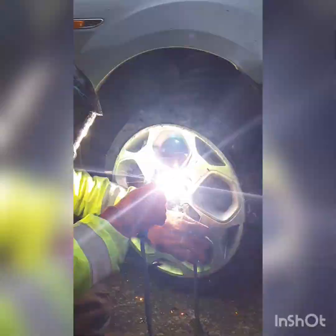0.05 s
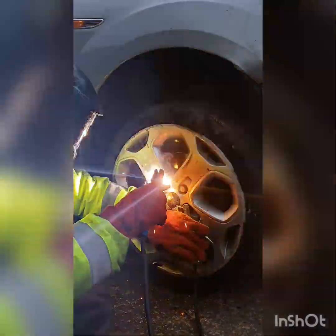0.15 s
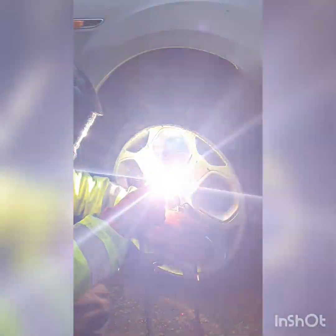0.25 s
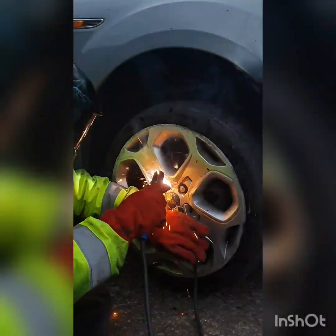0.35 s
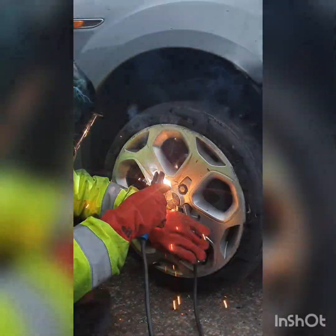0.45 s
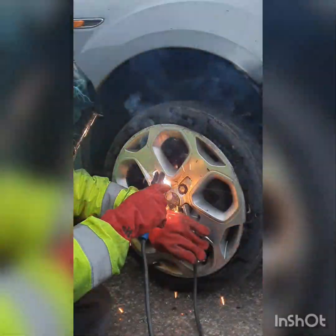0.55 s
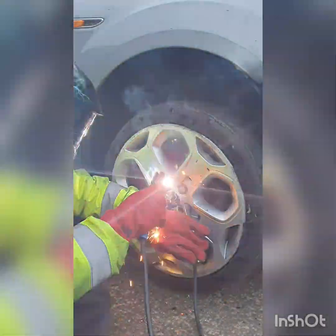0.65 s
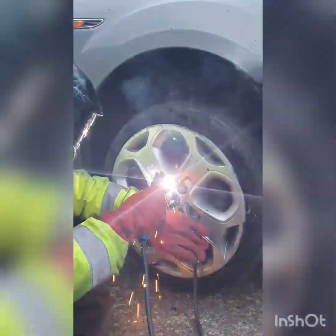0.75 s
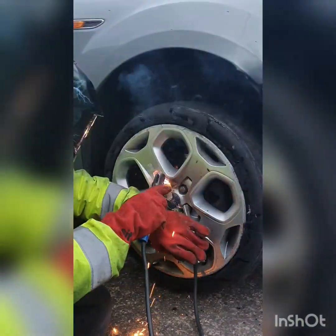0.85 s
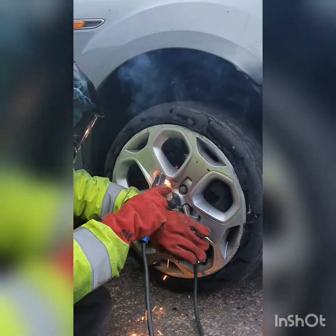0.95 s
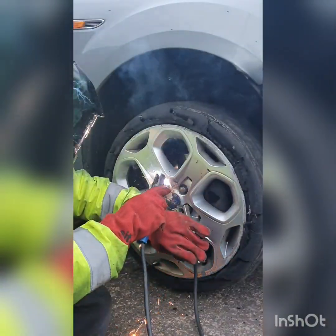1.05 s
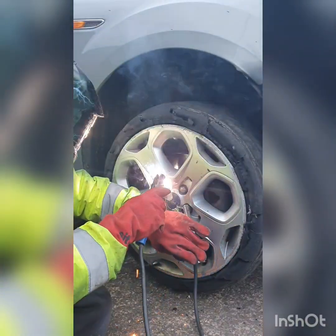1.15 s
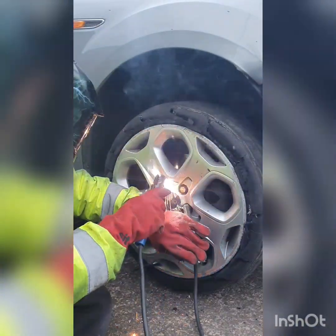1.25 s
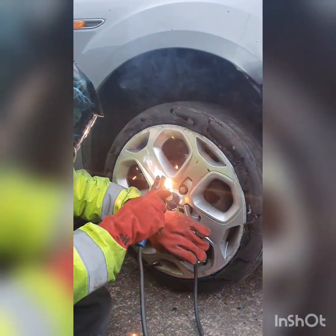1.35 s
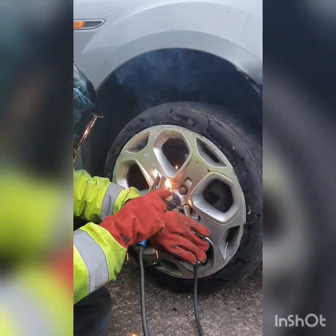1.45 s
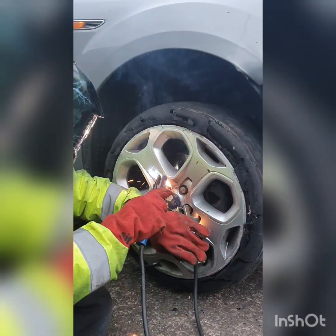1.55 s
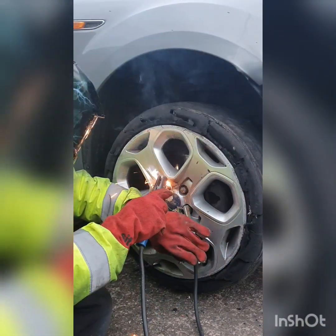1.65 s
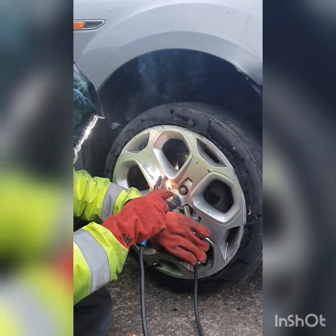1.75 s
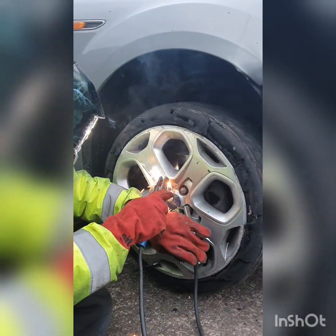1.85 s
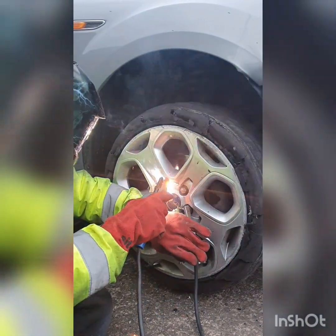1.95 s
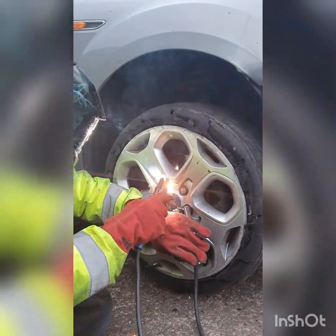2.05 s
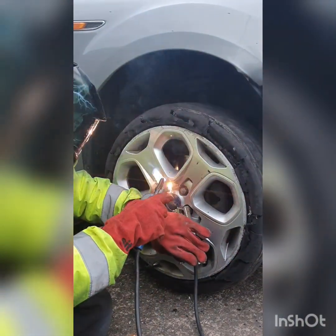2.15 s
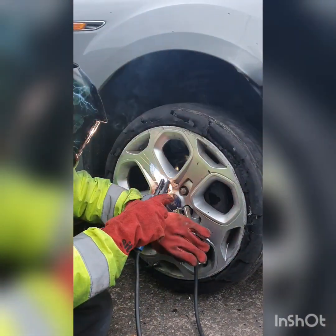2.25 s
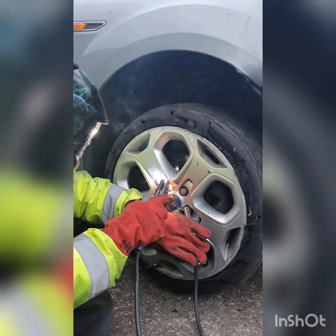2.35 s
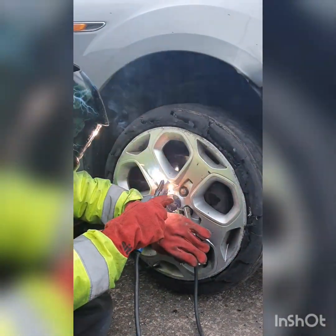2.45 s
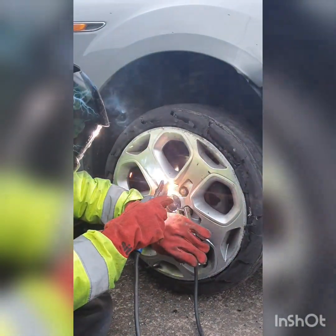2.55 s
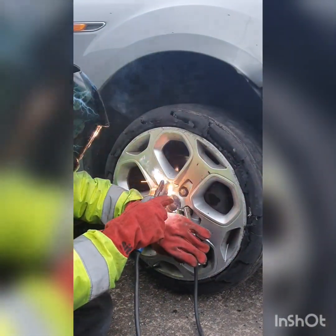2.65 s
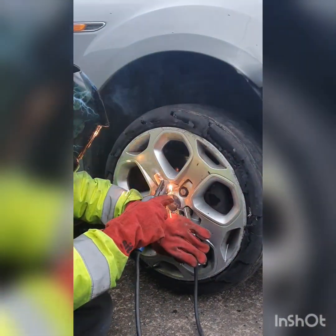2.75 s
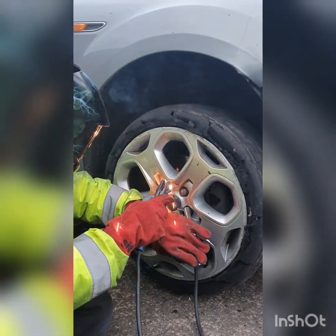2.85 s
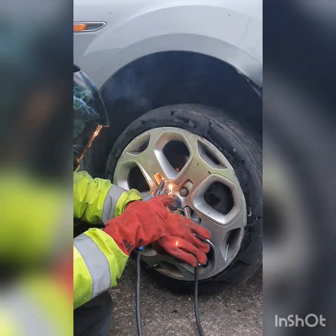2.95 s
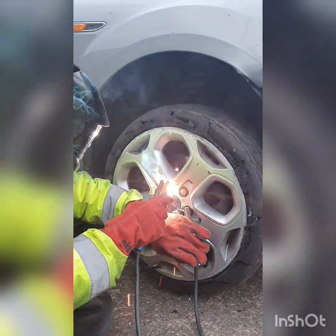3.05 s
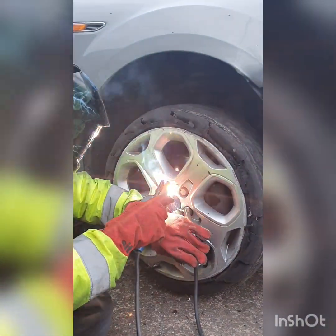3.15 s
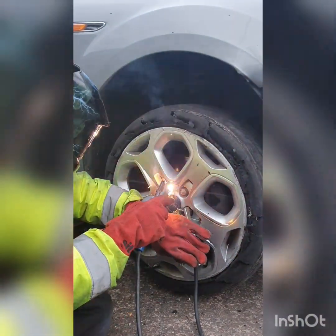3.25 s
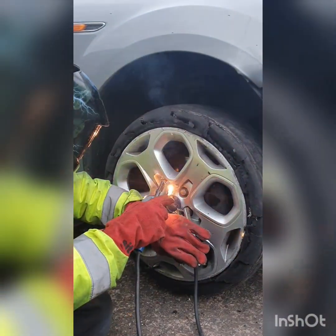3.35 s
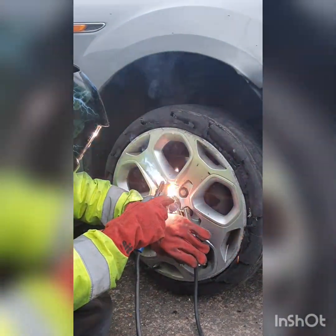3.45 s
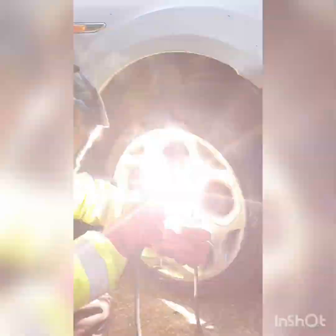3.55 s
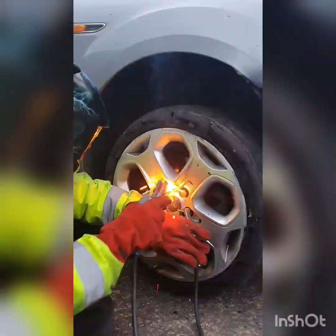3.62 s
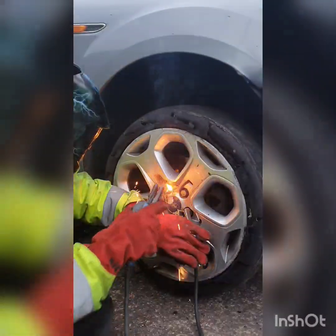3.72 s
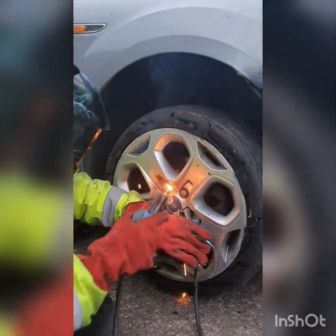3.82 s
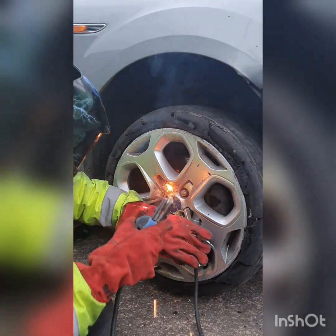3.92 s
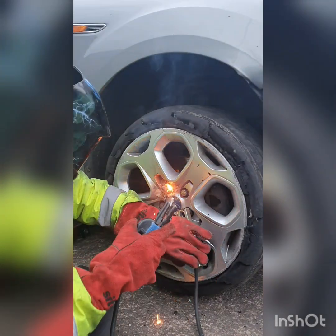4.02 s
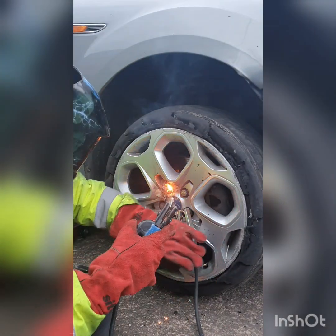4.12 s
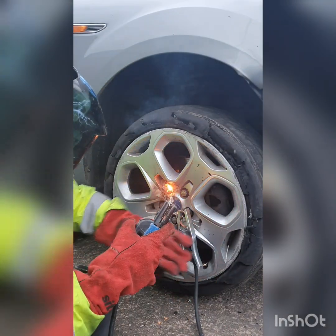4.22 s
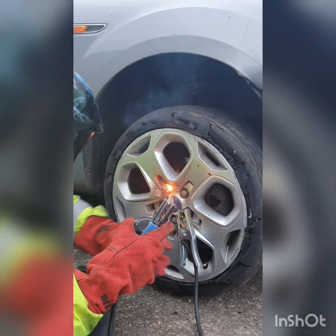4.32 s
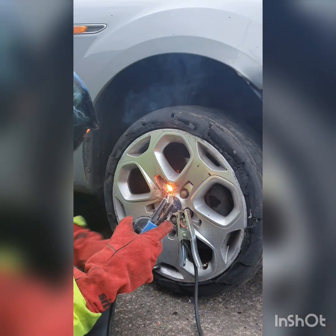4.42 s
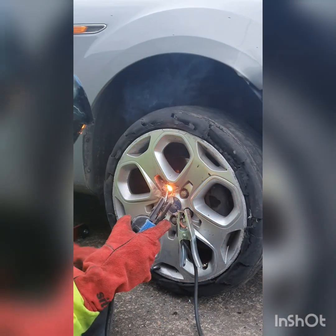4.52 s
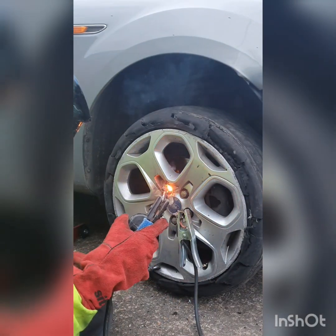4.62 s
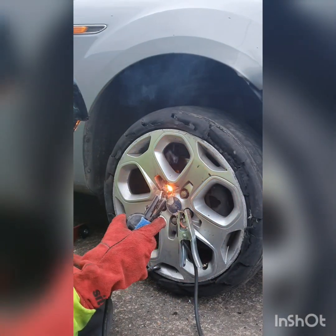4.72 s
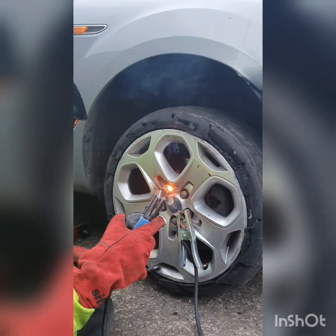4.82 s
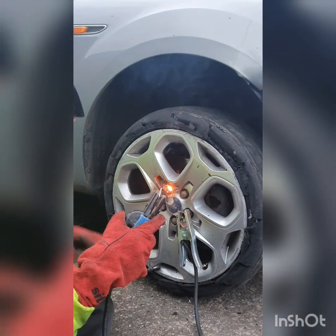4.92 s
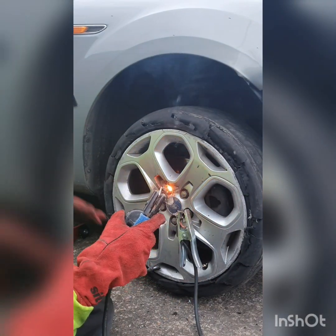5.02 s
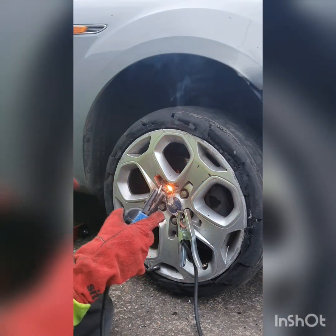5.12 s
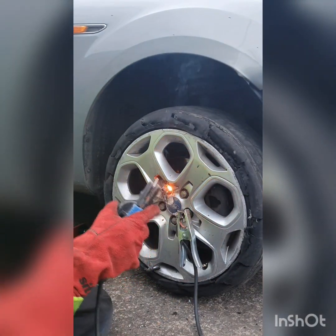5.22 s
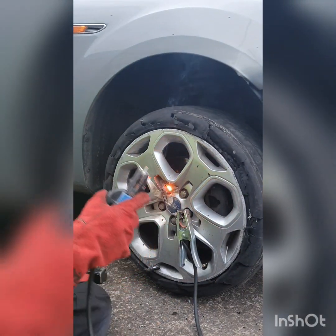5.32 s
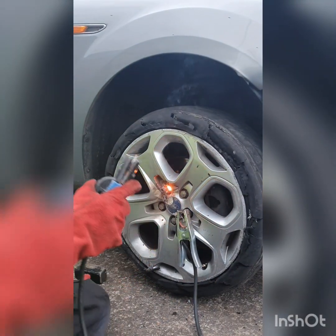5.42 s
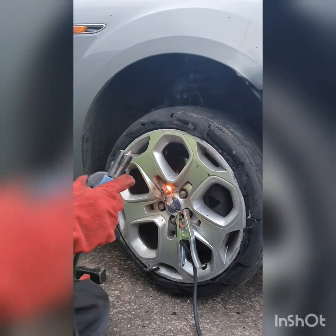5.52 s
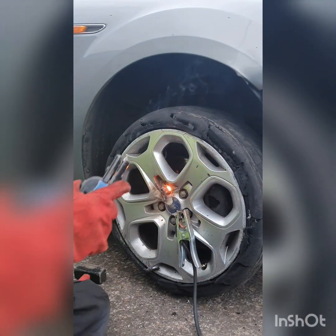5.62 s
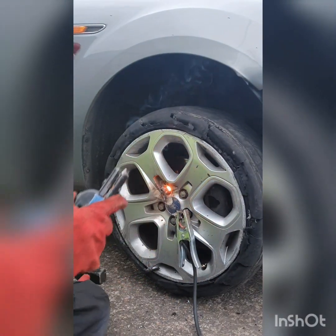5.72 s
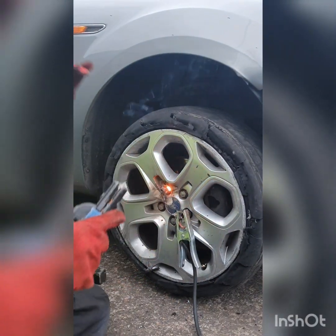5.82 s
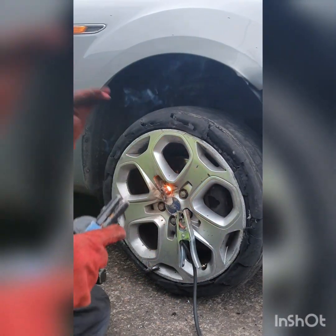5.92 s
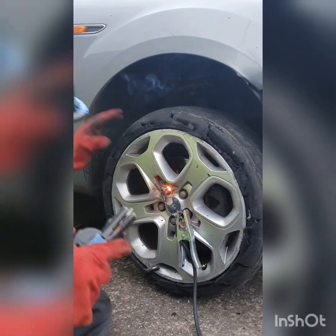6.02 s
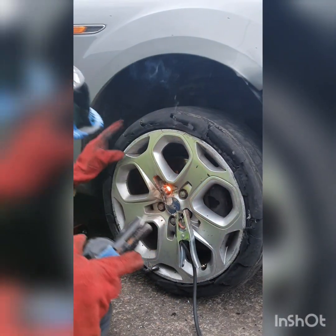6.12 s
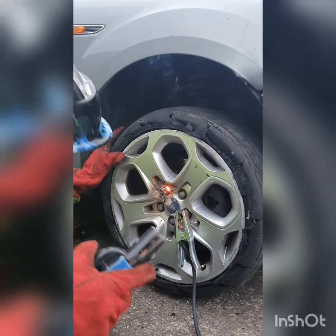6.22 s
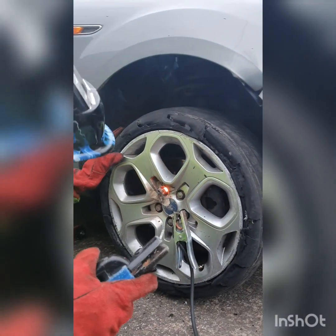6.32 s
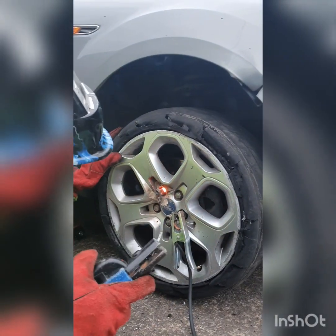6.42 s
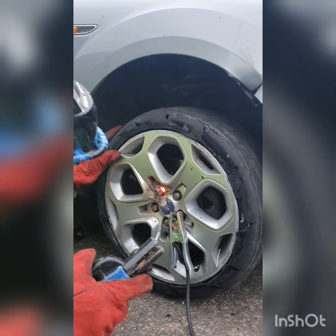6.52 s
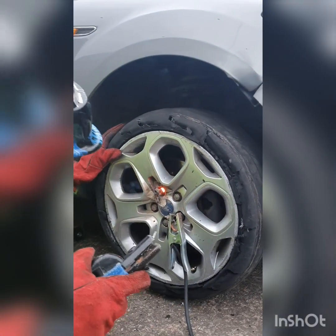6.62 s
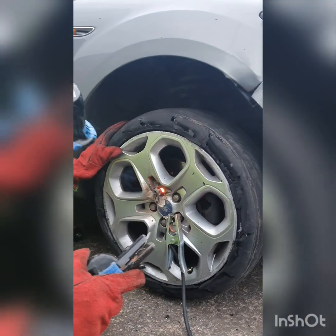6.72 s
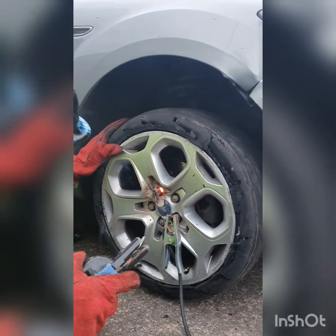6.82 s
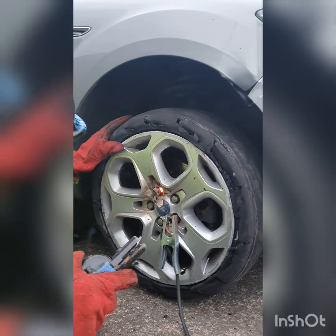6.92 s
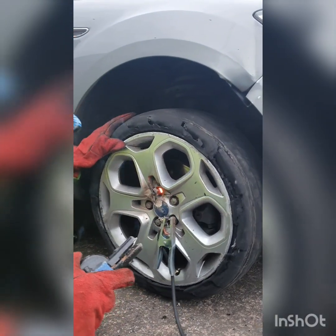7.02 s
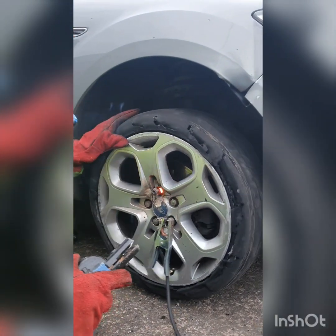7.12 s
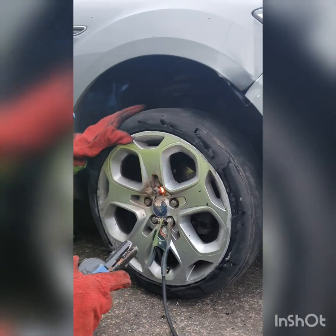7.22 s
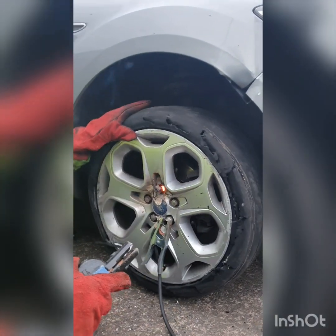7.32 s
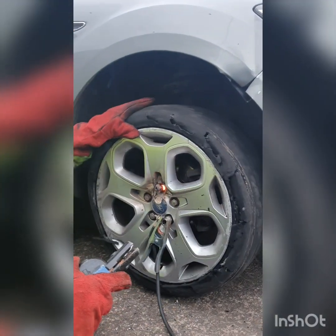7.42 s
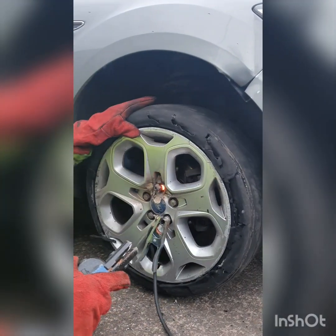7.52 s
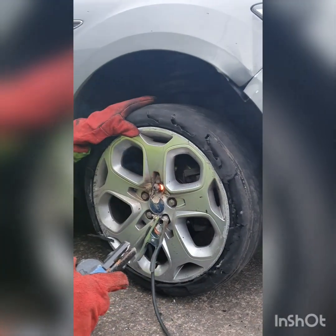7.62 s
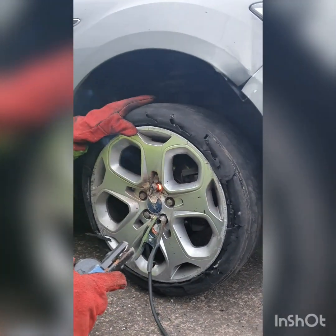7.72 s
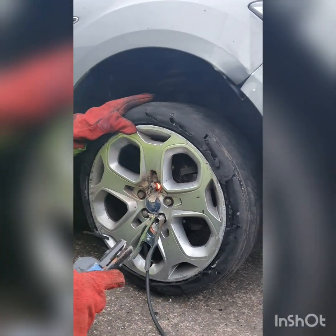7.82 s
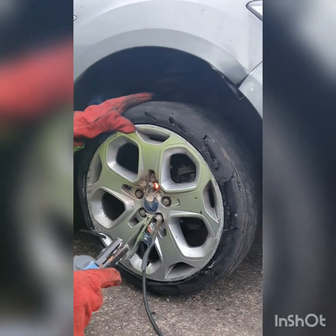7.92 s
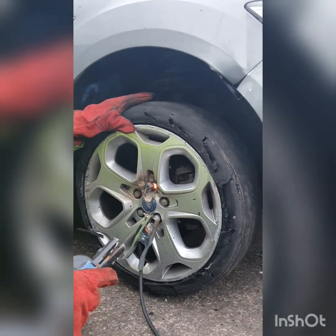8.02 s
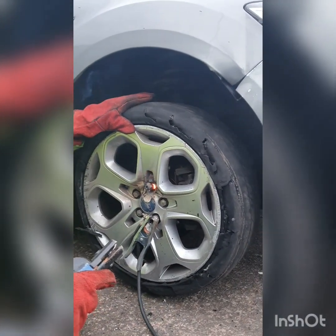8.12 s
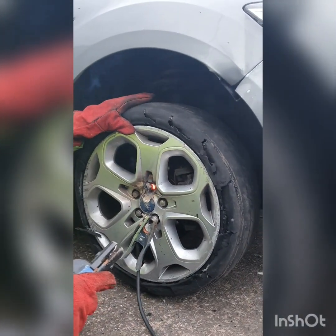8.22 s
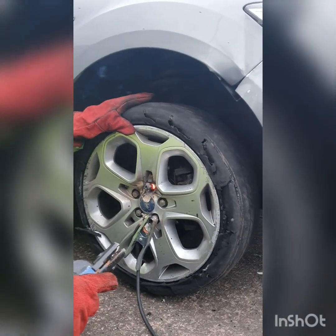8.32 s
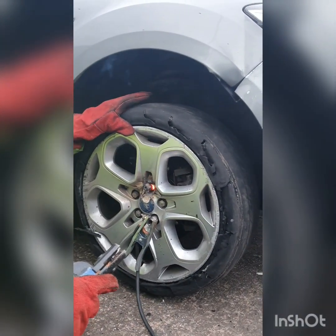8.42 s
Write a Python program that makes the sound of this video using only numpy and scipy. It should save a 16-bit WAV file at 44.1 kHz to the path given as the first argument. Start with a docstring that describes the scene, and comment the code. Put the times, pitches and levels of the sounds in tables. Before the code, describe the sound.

Loud stick welding fills the first three and a half seconds: gritty bright hiss, rapid sputter, dense snapping pops and short close echoes from car body and ground. Then sudden quiet, with low fan hum, soft air noise and far traffic. Tiny slag ticks, fabric rustle, fine sizzle, soft clacks and one bright clink follow, heard in close outdoor stereo.

```python
"""Outdoors at a car wheel, two microphones: a stick electrode welds a nut inside the wheel.
Arc noise hisses, sputters and pops over a thin fading inverter whine, then breaks off; filters and echoes set
it back from the microphones. Resonant noise groans nearby. Shaped noise then gives rustling clothes, sizzling
and ticking weld and things set down; decaying sines clink. Off to one side a fan hums in sines, over steady
noise of its air and far traffic.
"""
import sys
import numpy as np
from scipy import signal
from scipy.fft import rfft, irfft, next_fast_len
from scipy.io import wavfile

SR = 44100
rng = np.random.default_rng(int(sys.argv[2]) if len(sys.argv) > 2 else 0)


def file_out(sig):
    """Save sig as 16-bit WAV at sys.argv[1]."""
    # one column per channel
    cols = np.atleast_2d(sig).T
    # limit, then scale
    lim = np.clip(cols, -1, 1)
    pcm = np.round(lim * 32767).astype(np.int16)
    wavfile.write(sys.argv[1], SR, pcm)


N = 373086
TAIL = 8000   # longest event or echo, samples
SIZE = next_fast_len(N + TAIL)   # transform length
FREQ = np.maximum(np.arange(SIZE // 2 + 1) * SR / SIZE, 1)   # f/Hz of each bin


def from_db(db):
    """Decibels to gain."""
    return 10 ** (np.asarray(db) / 20)


def left_minus_right(db):
    """Split a balance in dB evenly over the left and right microphone."""
    return db * np.array([[.5], [-.5]])


def rms_one(x):
    """Scale to rms 1."""
    return x / np.sqrt(np.mean(x ** 2) + 1e-20)


def in_time(rows, silent=-120):
    """Columns of a curve at every sample, at the silent level outside it."""
    s, *columns = np.transpose(rows)
    return [np.interp(np.arange(N) / SR, s, c, silent, silent) for c in columns]


def at_hz(points, hz):
    """Columns of a spectrum at hz, on a log frequency axis."""
    f, *columns = np.transpose(points)
    return [np.interp(np.log(hz), np.log(f), c) for c in columns]


def band(x, low_hz, high_hz):
    """Band-pass."""
    sos = signal.butter(2, [low_hz, high_hz], "band", fs=SR, output="sos")
    return signal.sosfilt(sos, x)


def band_noise(low_hz, high_hz, channels=1):
    """Noise of rms 1 in a band."""
    return rms_one(band(rng.standard_normal((channels, N)), low_hz, high_hz))


def drift(rate_hz):
    """Slow random curve of rms 1: noise through two equal one-pole low-passes."""
    r = np.exp(-2 * np.pi * rate_hz / SR)
    smooth = signal.lfilter([1], [1, -2 * r, r * r], rng.standard_normal(N + SR))
    return rms_one(smooth[SR:])   # the first second only settles the filter


def narrow(hz, width_hz):
    """Noise twice through one resonance, rms 1: a rough tone."""
    r = np.exp(-np.pi * width_hz / SR)
    sos = [1, 0, -1, 1, -2 * r * np.cos(2 * np.pi * hz / SR), r * r]
    return rms_one(signal.sosfilt([sos, sos], rng.standard_normal(N)))


def bursts(times, peak_db, t60, rise=0.0012):
    """Envelope of events that rise quickly and die away by 60 dB in t60 seconds."""
    out, t = np.zeros(N + TAIL), np.arange(TAIL) / SR
    for s, db, ring in np.broadcast(times, peak_db, t60):
        at = round(s * SR)
        decay = from_db(db - 60 * t / max(ring, .002))
        out[at:at + TAIL] += decay * np.minimum(t / rise, 1)
    return out[:N]


# Fan air and far traffic, spectrum before scaling: (f/Hz, density/dB per Hz)
AIR_SPECTRUM = [(20, -24.5), (70, -4.5), (160, -19), (205, -12.5), (300, -15.5), (560, -15), (760, -7),
                (970, -18.5), (1200, -12.5), (1700, -23), (4000, -34), (6500, -42.5), (8500, -83),
                (13000, -53)]
# Balance of the two microphones: (f/Hz, left minus right/dB)
MIC_BALANCE = [(60, 7), (110, -8.5), (200, 0.5), (380, 1), (700, -4), (1290, -2.5), (2380, -5.5),
               (4400, -13.5), (8120, 27), (15000, -4)]
# Fan off to one side: (f/Hz, lead of the right microphone/rad, likeness of the microphones/0-1)
FAN_SIDE = [(60, 0, .88), (200, .2, .9), (370, 1.1, .85), (750, 2.4, .75), (950, 2.3, .3), (1300, 2.7, .92),
            (2200, 3.4, .6), (3800, 5.3, .5), (5000, 9.4, .2), (12000, 12.6, .3)]
AIR_DB = -44.5   # rms before the slow drift


def air():
    """Steady broad noise, partly shared by the microphones, the shared part with a phase lead on the right."""
    lead, alike = at_hz(FAN_SIDE, FREQ)
    alike = np.clip(alike, 0, 1)
    shared, own = rfft(rng.standard_normal((2, SIZE)))
    right = alike * shared * np.exp(1j * lead) + np.sqrt(1 - alike ** 2) * own
    balance_db = left_minus_right(at_hz(MIC_BALANCE, FREQ)[0])
    colour = from_db(at_hz(AIR_SPECTRUM, FREQ)[0] + balance_db)
    noise = rms_one(irfft(colour * [shared, right], SIZE)[:, :N])
    return from_db(AIR_DB + 1.37 * drift(3.8)) * noise


# Fan hum before shading: (multiple of the turning rate, rms level/dB)
FAN_LINES = [(4, -47.5), (5, -61), (7, -55.5), (8, -53), (12, -71.5), (14, -58.5), (21, -65)]
# Shading of the hum: (t/s, main tone change/dB, upper tones change/dB, top tone rms level/dB)
FAN_SHADE = [(0.0, -1, 8.5, -48), (2.7, 0, 0, -50), (3.8, -0.5, 3.5, -51), (5.3, 0, 4.5, -50.5),
             (6.4, 2.5, 3.5, -63), (8.46, 1, -0.5, -78)]
FAN_HZ = 92.77   # mean turning rate
MAIN_MULTIPLE, TOP_MULTIPLE = 4, 16


def fan_tones():
    """A turning fan sounds multiples of its rate, wavering a little in speed and strength."""
    turn = 2 * np.pi * np.cumsum(FAN_HZ * (1 + 0.0019 * drift(1.415))) / SR
    main_db, upper_db, top_db = in_time(FAN_SHADE, silent=0)
    levels = []
    for multiple, line_db in FAN_LINES:
        if multiple == MAIN_MULTIPLE:
            shade_db = main_db + 0.24 * drift(4.3)
        else:
            shade_db = upper_db + 2.03 * drift(4.0)
        levels.append((multiple, line_db + shade_db))
    levels.append((TOP_MULTIPLE, top_db))
    out = 0
    for multiple, db in levels:
        lead = at_hz(FAN_SIDE, multiple * FAN_HZ)[0]
        pan_db = left_minus_right(at_hz(MIC_BALANCE, multiple * FAN_HZ)[0])
        tone = np.sin(multiple * turn + np.array([[0], [lead]]))
        out = out + np.sqrt(2) * from_db(db + pan_db) * tone   # root 2: rms to peak
    return out


# Arc column at the wheel, before sputter: (t/s, hiss level/dB, upper hiss re hiss/dB, treble re hiss/dB)
ARC_COLUMN = [(0, -26.5, -11, -19.5), (.33, -29, -12.5, -15), (.35, -28.5, -7.5, -10),
              (.51, -27, -3.5, -12.5), (.79, -32, -6.5, -5), (.82, -28.5, -4, -5), (1.05, -28, -6.5, -2),
              (1.08, -29.5, -11, -12), (1.14, -28.5, -7, 7), (1.37, -35, -0.5, -26), (1.68, -31, -5.5, 0),
              (1.73, -33, -2, -7.5), (1.84, -33, -2, -2.5), (1.98, -33.5, -2.5, -6), (2.18, -29, 0, -0.5),
              (2.5, -32.5, -2, -9), (2.68, -31.5, -2, -3), (2.74, -30.5, -1, -2.5), (2.981, -28, -1, -3.5),
              (3.01, -36, -3, -6), (3.16, -33, -2.5, -4.5), (3.21, -29, -2, -5), (3.49, -34, -0.5, -5),
              (3.578, -28.5, -5, -16.5)]
ARC_OUT_S, ARC_FADE_DB_PER_S = 3.585, 904   # the arc breaks off


def arc_level():
    """Hiss level and relative upper and treble levels in dB; the last values hold until the arc breaks off."""
    s, *columns = np.transpose(ARC_COLUMN)
    t = np.arange(N) / SR
    hiss_db, upper_db, treble_db = [np.interp(t, s, c) for c in columns]
    fade_db = np.clip(ARC_FADE_DB_PER_S * (t - ARC_OUT_S), 0, 120)
    return hiss_db - fade_db, upper_db, treble_db


# Droplets short the arc, at the wheel: (t/s, envelope peak level/dB, treble re peak/dB)
DROPLET_POPS = [(0.0347, -18, -24), (0.0909, -17, -28), (0.1693, -15, -22), (0.2346, -13, -28),
                (0.339, -18, 0.5), (0.3558, -19, -12), (0.391, -19, -15), (0.4449, -9, -13),
                (0.4931, -6, -6.5), (0.5074, -2.5, -13), (0.547, -13, -15), (0.5603, -9, -6),
                (0.5749, -14, -4), (0.601, -14.5, -2), (0.6464, -14, -3), (0.7444, -15.5, -10),
                (0.7579, -11, -19), (0.8126, -16.5, 4), (0.8365, -22, 6), (0.8864, -12.5, -6),
                (0.921, -17, -12), (0.9518, -11, -11), (1.0232, -15, -9), (1.041, -29, -5),
                (1.1064, -11, -19), (1.1135, -3.5, -22), (1.1499, -5.5, -23), (1.214, -13, -17),
                (1.2458, -17, -3), (1.272, -28, -14), (1.3221, -11.5, -2), (1.3821, -8.5, -1.5),
                (1.4376, -15, -2), (1.5531, -15, -1), (1.5825, -11, -5), (1.6354, -19, -17),
                (1.7524, -11, -3), (1.7812, -15, -17), (1.8, -7, -1), (1.8214, -16, -7), (1.84, -6, -5),
                (1.892, -18.5, -1), (1.9335, -28, -4), (1.9437, -9.5, -1.5), (2.0149, -11, -1),
                (2.076, -17, -2), (2.1327, -13, -14), (2.1538, -15, -12), (2.1705, -11, -15),
                (2.1757, -11, -14), (2.1854, -13.5, -9), (2.1919, -11, 0.5), (2.2583, -11, -5),
                (2.2764, -13.5, 5), (2.376, -21, 0), (2.3895, -7.5, -2.5), (2.3944, -18, -21),
                (2.4234, -7, -3), (2.4766, -7.5, -3.5), (2.5928, -15, -22), (2.6932, -18, -14),
                (2.7324, -12, -3), (2.7635, -22, -12), (2.828, -9, 0), (2.8785, -10.5, -12),
                (2.8979, -12, -12), (2.9406, -16, -7), (2.959, -29, -15), (3.028, -29, -9),
                (3.0392, -4, -6.5), (3.0744, -14.5, 1), (3.1067, -9, -5), (3.1833, -7, -11),
                (3.1897, -1.5, -26.5), (3.221, -18, -14), (3.2732, -17.5, -16), (3.3992, -13, -14),
                (3.415, -13, 0), (3.4453, -18, -3), (3.49, -25, -22), (3.5533, -13, -25),
                (3.5765, -23, -23)]
POP_T60_S = 0.0069
ROAR_DB, ROAR_FOLLOWS = -38.5, 0.62   # low roar at the table's mean hiss level; share of the hiss swing
WANDER = 0.48   # the arc root jumps about: noise of each microphone's own, relative to the shared noise
CRACKLES_PER_S, CRACKLE_T60_S = 120, 0.0028


def arc():
    """Turbulent plasma noise that sputters, with random crackles and large pops; dry, one row a microphone."""
    hiss_db, upper_db, treble_db = arc_level()
    middle_db = np.mean(np.transpose(ARC_COLUMN)[1])
    roar_db = ROAR_DB + ROAR_FOLLOWS * (hiss_db - middle_db)

    sputter = from_db(2.0 * drift(18) + 3.1 * drift(190))
    born = rng.random(N) < CRACKLES_PER_S / SR
    sizes = from_db(1.5 * np.minimum(rng.exponential(1, N), 3))
    keep = from_db(-60 / (CRACKLE_T60_S * SR))   # decay per sample
    crackle = signal.lfilter([1], [1, -keep], born * sizes + 1e-18)
    unrest = sputter + 1.65 * crackle

    shared, *own = rng.choice([-1., 1.], (3, N))
    plasma = shared + WANDER * np.array(own)
    roar = rms_one(band(plasma, 560, 1790))
    body = rms_one(band(band(plasma, 1444, 3500), 1043, 3630))
    upper = rms_one(band(plasma, 3640, 6970))
    treble = rms_one(band(plasma, 10350, 14330))

    s, peak_db, bright_db = np.transpose(DROPLET_POPS)
    pops = bursts(s, peak_db, POP_T60_S, rise=0.00049)
    treble_pops = bursts(s, peak_db + bright_db, POP_T60_S, rise=0.00035)
    out = body * (from_db(hiss_db) * unrest + pops)
    out += upper * (from_db(hiss_db + upper_db) * unrest + from_db(-2.0) * pops)
    out += roar * (from_db(roar_db) * unrest + from_db(-7) * pops)
    out += treble * (from_db(hiss_db + treble_db) * unrest + treble_pops)
    return out


WHINE_HZ, WHINE_WIDTH_HZ = 12005, 40
WHINE_DB, WHINE_FADE_DB_PER_S = -45, 18   # start level at the wheel, steady fade


def whine():
    """The inverter sings at its switching rate: a thin rough tone, narrow noise that fades steadily."""
    level_db = WHINE_DB - WHINE_FADE_DB_PER_S * np.arange(N) / SR
    return from_db(level_db) * narrow(WHINE_HZ, WHINE_WIDTH_HZ)


def path(peaks):
    """Causal response of a chain of resonant peaks and dips."""
    out = 1
    for hz, width, db in peaks:
        swing, gap = from_db(db / 2), hz ** 2 - FREQ ** 2
        out = out * (gap + 1j * FREQ * width * swing) / (gap + 1j * FREQ * width / swing)
    return out


# Wheel, gloves and ground colour the way to each microphone: (f/Hz, width/Hz, level/dB)
PATH_LEFT = [(815, 1360, 5.5), (1320, 1120, 6), (1580, 140, -6), (1700, 1000, -11.5), (2385, 380, 14),
             (3110, 360, 4.5), (3580, 220, -9.5), (4160, 1500, 8.5), (5560, 82, 6.5), (7130, 850, 11.5),
             (7520, 150, 1), (8870, 420, 11), (9820, 640, 9.5), (11590, 580, 11), (12800, 440, 12),
             (14700, 1200, 16.5)]
PATH_RIGHT = [(825, 260, 2.5), (1096, 555, 11.5), (1566, 94, -7.5), (1900, 250, 11), (2360, 465, 8),
              (2760, 133, -5), (3288, 314, 15), (4380, 510, 13.5), (6100, 360, -3), (5450, 260, 0),
              (8100, 1300, -1), (10100, 810, -0.5), (10780, 740, 7.5), (14000, 4400, 4.5)]
DISTANCE_DB = -9.5   # loss from the wheel to the microphones
LEFT_LAG_S = -0.000018   # negative: the left microphone hears the wheel first
YARD_T60_S, YARD_DB = 0.046, -4.5   # echo decay; echo energy relative to the direct sound


def at_microphones(dry):
    """Each microphone hears the wheel by its own path, then scattered echoes of car body and ground."""
    t = np.arange(TAIL) / SR
    scatter = rng.standard_normal((2, TAIL)) * from_db(-60 * t / YARD_T60_S)
    scatter *= t > .0015   # s before the first echo
    scatter *= from_db(YARD_DB) / np.sqrt(np.sum(scatter ** 2, 1, keepdims=True))
    lag = np.exp(-2j * np.pi * FREQ * LEFT_LAG_S)
    paths = from_db(DISTANCE_DB) * np.array([lag * path(PATH_LEFT), path(PATH_RIGHT)])
    heard = rfft(dry, SIZE) * paths * (1 + rfft(scatter, SIZE))
    return irfft(heard, SIZE)[:, :N]


GROAN_ATTACK_S, GROAN_HOLD_S, GROAN_RELEASE_S = .03, .06, .05


def swell(start):
    """Rise, hold and fall, from 0 to 1 and back."""
    t = np.arange(N) / SR - start
    corners = np.cumsum([0, GROAN_ATTACK_S, GROAN_HOLD_S, GROAN_RELEASE_S])
    return np.interp(t, corners, [0, 1, 1, 0])


# Hollow groans nearby: (t/s, main ring level/dB, other rings level/dB, thump level/dB)
GROANS = [(0.069, -44, -34, -40.5), (0.806, -39, -37.5, -36), (3.215, -36.5, -37, -64)]
# Rings of the hollow body, main ring first: (f/Hz, width/Hz, relative level/dB, late by t/s)
GROAN_RINGS = [(441, 39, 0.5, 0.012), (237, 130, -13.5, 0.0088), (579, 88, -3.5, .02), (785, 86, -7, .004),
               (872, 78, -5, .002), (1165, 340, -2.5, .001)]
AGAIN_S, AGAIN_MAIN_DB, AGAIN_OTHER_DB = 0.179, -4, -6.5   # each groan comes a second time, weaker
THUMP_LATE_S, GROAN_RAGGED_DB = 0.033, 2


def groans():
    """Rough rubbing in a hollow body: resonances driven by noise swell twice, with one soft low thump."""
    out, thump = 0, narrow(102, 40)
    rings = []
    for hz, width, db, _ in GROAN_RINGS:
        rings.append(from_db(db + GROAN_RAGGED_DB * drift(29)) * narrow(hz, width))
    for s, main_db, other_db, thump_db in GROANS:
        for k, (ring, (*_, late)) in enumerate(zip(rings, GROAN_RINGS)):
            level_db, again_db = (other_db, AGAIN_OTHER_DB) if k else (main_db, AGAIN_MAIN_DB)
            shape = swell(s + late) + from_db(again_db) * swell(s + AGAIN_S)
            out = out + from_db(level_db) * ring * shape * from_db(left_minus_right(5))
        out = out + from_db(thump_db) * thump * swell(s + THUMP_LATE_S)
    return out


# Clothes and cooling weld, before grain and pan:
# (t/s, mid rustle level/dB, bright rustle level/dB, high sizzle level/dB)
RUSTLE_AND_SIZZLE = [(3.6, -53, -70, -69), (3.83, -55, -67, -64), (4.07, -58, -82, -77),
                     (4.91, -58, -75, -77), (5.16, -51, -65, -74), (5.39, -49, -58, -64),
                     (5.64, -48, -56, -63.5), (6.09, -50, -65, -68), (6.36, -57.5, -79, -77),
                     (7.05, -54.5, -71.5, -72), (7.38, -61, -79, -80), (7.69, -61.5, -87, -88),
                     (8.46, -70.5, -87, -89)]


def rustle():
    """Clothes rub in grainy middle and bright noise; the cooling weld is a fine smooth sizzle on top."""
    mid_db, bright_db, high_db = in_time(RUSTLE_AND_SIZZLE)
    grain_db = 1.1 * drift(10.0)
    cloth = from_db(mid_db + grain_db) * band_noise(1660, 3970, channels=2)
    cloth += from_db(bright_db + grain_db) * band_noise(4900, 7200, channels=2)
    sizzle = from_db(high_db) * band_noise(11000, 14900, channels=2)
    return cloth + sizzle * from_db([[3], [-1.5]])   # sizzle stronger on the left


# Cracking slag, before the pan: (t/s, envelope peak level/dB, lower part re peak/dB)
SLAG_TICKS = [(3.7047, -45, 2), (4.037, -63, 7), (4.101, -48, -4), (4.2266, -63, 9), (4.269, -66, 14),
              (4.3748, -60, 10), (4.4544, -41, -2), (4.47, -39, -6), (4.579, -58, 12), (4.6161, -44.5, 6.5),
              (4.7654, -59, 11), (4.825, -50, 12.5), (4.916, -41, 0), (4.9814, -50, 0), (5.129, -43, 0),
              (5.1806, -47, 6)]
TICK_PAN_DB = 6   # left minus right


def ticks():
    """Slag cracks as it shrinks: tiny bright clicks of decaying noise."""
    s, peak_db, low_db = np.transpose(SLAG_TICKS)
    high, low = band_noise(4600, 16600), band_noise(1500, 5500)
    clicks = high * bursts(s, peak_db, 0.011) + low * bursts(s, peak_db + low_db, 0.012)
    return clicks * from_db(left_minus_right(TICK_PAN_DB))


# Things set down: (t/s, clack envelope peak level/dB, thump envelope peak level/dB)
KNOCKS = [(5.268, -30, -34), (5.277, -37, -43), (5.299, -45, -33), (5.329, -38, -48), (5.936, -38.5, -54),
          (6.199, -40, -60), (7.289, -45, -57)]
KNOCK_T60_S = 0.059


def knocks():
    """Things set down on the ground: a dull clack of noise and a low resonant thump."""
    s, peak_db, thump_db = np.transpose(KNOCKS)
    clack = band_noise(240, 1830, channels=2) * bursts(s, peak_db, KNOCK_T60_S, rise=0.0018)
    thump = narrow(92, 30) * bursts(s, thump_db, 0.2, rise=0.02)
    return clack + thump


# Metal touches metal, before the pan: (t/s, peak level/dB)
CLINKS = [(7.154, -44), (7.1697, -25.5)]
# Modes of a small steel part: (f/Hz, relative level/dB, t60/s)
CLINK_MODES = [(2600, -16, .01), (3400, -11, 0.012), (3930, -2, 0.02), (5000, -6, 0.016),
               (6000, -11, 0.014), (9300, -21, 0.009), (11600, -14, 0.02), (12000, -12, 0.035),
               (12400, -18, 0.02)]


def clinks():
    """Each touch rings the modes of a small steel part as decaying sines."""
    out, t = np.zeros(N), np.arange(4000) / SR
    ring = sum(from_db(db - 60 * t / t60) * np.sin(2 * np.pi * hz * t) for hz, db, t60 in CLINK_MODES)
    ring = ring / np.max(abs(ring))
    for s, peak_db in CLINKS:
        at = round(s * SR)
        out[at:at + 4000] += from_db(peak_db) * ring
    return out * from_db(left_minus_right(5))


def scene():
    """Everything at the two microphones."""
    background = air() + fan_tones()
    wheel = at_microphones(arc() + whine())
    return background + wheel + groans() + rustle() + ticks() + knocks() + clinks()


CUTOFF_HZ = 15750


def record(dry):
    """A steep low-pass cuts the top."""
    sos = signal.ellip(12, .5, 55, CUTOFF_HZ, fs=SR, output="sos")   # ripple/dB, stop band depth/dB
    return signal.sosfilt(sos, dry)


dry = scene()
out = record(dry)
file_out(out)
```